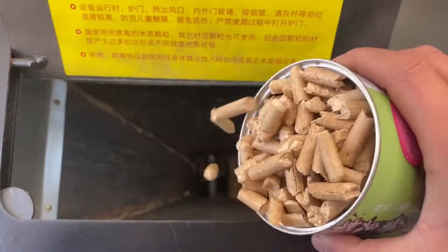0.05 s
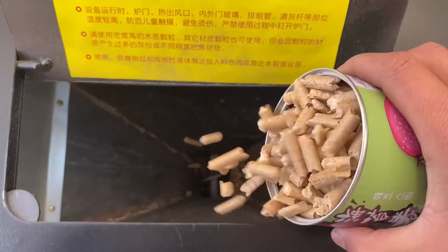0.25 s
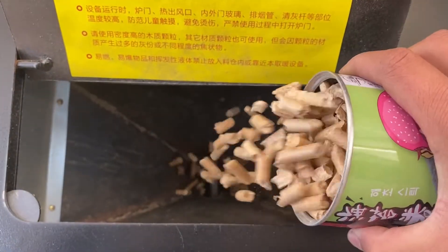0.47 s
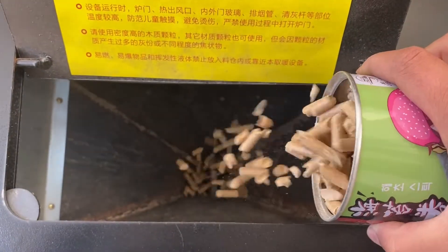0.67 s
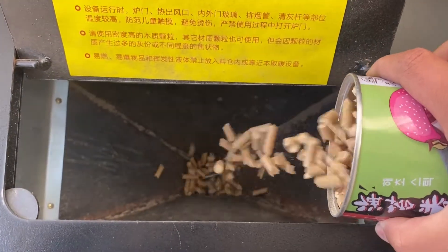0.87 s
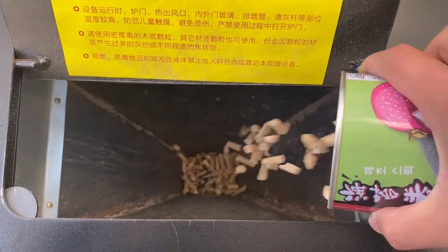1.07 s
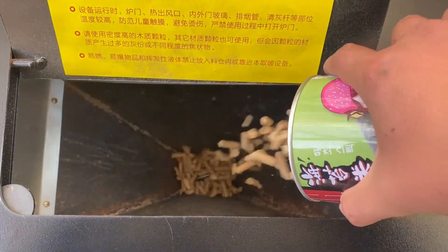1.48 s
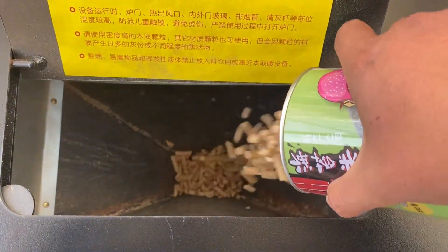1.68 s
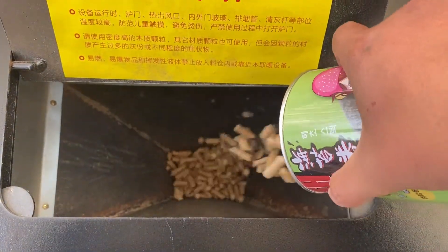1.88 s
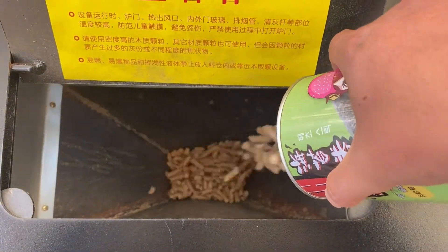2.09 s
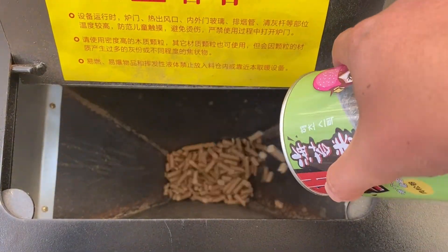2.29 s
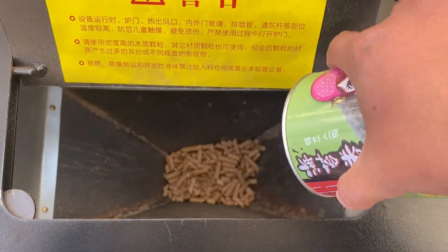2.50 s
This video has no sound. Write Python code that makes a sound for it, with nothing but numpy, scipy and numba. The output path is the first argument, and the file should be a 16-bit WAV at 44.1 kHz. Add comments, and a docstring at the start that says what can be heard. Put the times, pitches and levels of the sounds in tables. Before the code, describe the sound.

Wood pellets pour into a steel hopper up close, clattering and pattering against its ringing walls.

```python
"""A small room: wood pellets are shaken from a can into a steel hopper, close to the microphone.
Pellets tick in the can, which knocks as it tips. Clumps clatter on the walls, single pellets patter
and land on the heap, heavy blows ring the hopper's floor and a side panel.
Mains hum and soft air lie underneath; gain control ducks everything while the pellets fall."""
import sys
import numpy as np
from scipy import signal
from scipy.fft import rfft, irfft
from scipy.io import wavfile
from numba import njit

SR = 44100
rng = np.random.default_rng(int(sys.argv[2]) if len(sys.argv) > 2 else 0)


def generate_wav(sig):
    """Save sig (samples, or channels by samples) to the path in sys.argv[1] as 16-bit PCM at SR."""
    pcm = np.round(np.clip(np.atleast_2d(sig).T, -1, 1) * 32767).astype(np.int16)
    wavfile.write(sys.argv[1], SR, pcm)


N = 116865
t = np.arange(N) / SR
ring_t = t[:int(SR * .6)]

# mains hum partials (frequency [Hz], level [dB])
HUM_PARTIALS = [(100, -39), (200, -53)]
# noise spectra (frequency [Hz], relative level [dB])
AIR_COLOUR = [(30, -29), (70, 3), (130, -5), (300, 0.5), (600, -7), (1000, -18), (2000, -16), (5000, -22.5),
              (15000, -39.5)]
TICK_COLOUR = [(800, -36), (2000, -7), (3800, -2), (9000, -8), (15500, -21)]
BUMP_COLOUR = [(60, -26), (150, -18.5), (300, 4), (600, -1.5), (1200, -5), (2500, -17.5), (8000, -32)]
PATTER_COLOUR = [(100, -28.5), (900, -9.5), (2200, -11), (2800, -6), (5000, -2.5), (7800, -4), (11000, -9),
                 (15500, -14)]
HEAP_COLOUR = [(130, -39), (420, -15.5), (550, 3.5), (820, -7.5), (1100, 2), (1800, 3.5), (2900, -1.5),
               (5000, -1), (9000, -38)]
THUD_COLOUR = [(70, 4), (260, 0.5), (480, -18)]
WALL_COLOUR = [(45, -51), (150, -52.5), (430, -42), (620, 0), (820, -18), (1000, -12), (2100, -11.5),
               (2800, -10), (4000, -6), (6000, -2), (7800, -0.5), (11000, -4.5), (15500, -9.5)]
# decay of hopper and room (band centre [Hz], t60 [s], relative level [dB])
TAIL_BANDS = [(295, 0.17, 2), (1200, 0.51, 2), (3070, 0.27, 3), (6570, .27, -7.5), (13900, .18, -41)]
# wall modes (frequency [Hz], relative level [dB])
WALL_MODES = [(978, -6), (1418, -5), (1740, -7.5), (2000, -7), (2363, -7), (2675, -3), (2770, -3),
              (2864, -6), (3066, -7), (3570, -6), (4387, -6), (5628, -6), (6396, -5), (7765, -4)]
# floor and side panel modes (frequency [Hz], relative level [dB], t60 [s])
FLOOR_MODES = [(558, -1, .17), (619.5, 0, .27), (669, -1, .18), (708, -5, .13)]
PANEL_MODES = [(1418, 0, .23), (1525, -4, .2)]
# pellets shifting in the can (time [s], relative level [dB], ring [Hz])
CAN_TICKS = [(.0045, -23.5, 4300), (0.0679, -22.5, 5200), (0.114, -22, 3830), (.151, -22.5, 4780)]
# heavy blows on floor and side panel (time [s], level [dB], favoured frequency [Hz])
FLOOR_BLOWS = [(.222, -19.5, 560), (.263, -10, 661), (.43, -15, 579), (.52, -9.5, 588), (.593, -10.5, 663),
               (.715, -14, 634), (.895, -6, 593), (.935, -3, 640), (1.374, -9, 599), (1.46, -2.5, 675),
               (1.562, -7, 662), (1.738, -2.5, 598), (1.872, -2, 645), (2.057, -1.5, 670),
               (2.098, -0.5, 661), (2.16, -6, 663), (2.285, -9.5, 668), (2.459, -24, 670)]
PANEL_BLOWS = [(.22, -16, 1420), (.987, -4, 1400), (1.14, -8.5, 1400), (1.245, -12, 1420),
               (1.48, -10, 1440), (1.75, -4, 1400), (1.86, -4.5, 1480), (1.96, -6, 1430)]
# stream strength (time [s], relative patter level [dB], relative heap level [dB])
FLOW = [(0.217, -22.5, -30), (0.268, -26.5, -26.5), (.37, -32.5, -46), (0.451, -21.5, -29),
        (.57, -19.5, -48), (.62, -16.5, -26), (.67, -17, -36), (0.738, -27, -30.5), (0.798, -21.5, -31),
        (1.0, -23, -29.5), (1.1, -20, -33.5), (1.16, -15, -28), (1.26, -30, -35.5), (1.35, -28, -34),
        (1.42, -20, -27), (1.53, -20.5, -27), (1.75, -15.5, -23.5), (1.929, -17, -24.5), (2.0, -18, -22),
        (2.119, -21.5, -23.5), (2.26, -37.5, -34), (2.33, -20.5, -26.5), (2.408, -47, -38)]
# pellets that ring out alone (time [s], frequency [Hz], level [dB])
PINGS = [(.268, 7450, -5), (.406, 7280, -4.5), (.587, 9750, -6), (.622, 2690, -5), (.872, 7270, -10),
         (1.057, 7700, -15), (1.282, 7900, -2), (1.314, 7760, -4), (1.922, 2770, 0), (2.11, 2770, -3.5)]
# clumps on the walls (time [s], relative level [dB], mids against treble [dB])
CLUMPS = [(.1995, -15.5, -20), (.218, -4.5, -1.5), (.266, -4.5, 5.5), (.2975, 2.5, -14), (.379, -19, -9),
          (.406, -10, -5), (.478, -3.5, -6), (.488, 2, -3.5), (.506, -4.5, 1), (.529, -7.5, -28),
          (.593, -5.5, 8), (.617, -1, 1), (.684, 3.5, -5), (.704, -4, 6), (.724, 0.5, 4), (.739, -4.5, 12),
          (.9, -12, 13), (.93, -5, 1), (.963, -1, -1.5), (1.004, -5.5, 6.5), (1.052, -2, -13),
          (1.12, -11.5, 6.5), (1.185, -7, 3), (1.282, -1, 1.5), (1.313, -3.5, 0), (1.373, -5, 6.5),
          (1.384, -2.5, -23), (1.466, -2, 3.5), (1.49, -2.5, -0.5), (1.554, 3, -7.5), (1.573, -1.5, 2),
          (1.622, -7, 6), (1.676, -4.5, 5), (1.694, -1.5, -4), (1.774, -4.5, 4), (1.854, -0.5, -3),
          (1.902, 3.5, 1.5), (1.924, -5.5, 11), (1.961, 3, -23), (2.042, 5, -2), (2.099, -3, 5.5),
          (2.139, -1.5, -17), (2.166, -11, -1), (2.196, -8.5, 5), (2.276, -17.5, 13.5), (2.316, -12, -2),
          (2.339, -11.5, -15), (2.362, -9.5, -1.5), (2.459, -28, 16.5)]


def undb(db):
    """Decibels to gain."""
    return 10 ** (np.asarray(db) / 20)


def unit(x):
    """Scale to unit energy."""
    return x / np.sqrt(np.sum(x ** 2))


def fade(t60_s):
    """Exponential ring-down."""
    return np.exp(-np.log(1000) * ring_t / t60_s)


def tone(hz, t60_s, wave=np.sin):
    """One damped mode."""
    return fade(t60_s) * wave(2 * np.pi * hz * ring_t)


def add(out, at_s, x):
    """Mix x into out at a time."""
    i = max(int(at_s * SR), 0)
    out[i:i + len(x)] += x[:len(out) - i]


def excite(x, response):
    """Convolve x with an impulse response."""
    return signal.fftconvolve(x, response)[:N]


def noise(colour, size=len(ring_t)):
    """Noise of rms 1 with the given spectrum."""
    hz, db = np.array(colour).T
    bins_hz = np.fft.rfftfreq(size, 1 / SR)
    magnitude = undb(np.interp(np.log(bins_hz + 1), np.log(hz), db))
    x = irfft(np.exp(2j * np.pi * rng.random(len(bins_hz))) * magnitude, size)
    return x / x.std()


def room(air_db=-41):
    """Mains hum over a soft rush of air."""
    hum = sum(undb(db) * np.sin(2 * np.pi * (hz * t + rng.random())) for hz, db in HUM_PARTIALS)
    return np.sqrt(2) * hum + undb(air_db) * noise(AIR_COLOUR, N)


def can(tip_s=.146, bump_db=-26.5):
    """Dry ticks of pellets shifting in the can; a dull knock as it tips."""
    out = np.zeros(N)
    for at_s, db, hz in CAN_TICKS:
        tick = noise(TICK_COLOUR) * fade(t60_s=.025) + undb(8.5) * tone(hz, t60_s=.009)
        add(out, at_s, undb(db - 6) * tick)
    add(out, tip_s, undb(bump_db) * noise(BUMP_COLOUR) * fade(t60_s=.36))
    return out


def sheet(blows, modes, rise_s=.0082, detune_db_per_hz=.4, crunch_db=-10, band_ratio=1.12):
    """A struck steel sheet rings, roughened by crunching pellets; each spot favours nearby modes."""
    out = np.zeros(N)
    for at_s, blow_db, spot_hz in blows:
        ring = sum(undb(db - detune_db_per_hz * abs(hz - spot_hz)) * tone(hz, t60_s, np.cos)
                   for hz, db, t60_s in modes)
        band = signal.butter(2, [spot_hz / band_ratio, spot_hz * band_ratio], "band", fs=SR)
        crunch = signal.lfilter(*band, rng.standard_normal(len(ring_t))) * fade(t60_s=.12)
        blow = unit(ring) + undb(crunch_db) * unit(crunch)
        blow *= 1 - np.exp(-ring_t / rise_s)
        add(out, at_s, undb(blow_db) * blow / np.abs(blow).max())
    return out


def struck_modes(modes):
    """Modes rung from one spot, each with random polarity."""
    return unit(sum(undb(db) * rng.choice([-1, 1]) * unit(tone(hz, t60_s, np.cos))
                    for hz, db, t60_s in modes))


def hopper_tail(colour):
    """Hopper and room ring on, each band at its own decay rate."""
    spectrum = rfft(noise(colour))
    log_bins = np.log(np.fft.rfftfreq(len(ring_t), 1 / SR) + 1)
    log_centres = np.log(np.array(TAIL_BANDS)[:, 0])
    tail = np.zeros(len(ring_t))
    for share, (_, t60_s, db) in zip(np.eye(len(TAIL_BANDS)), TAIL_BANDS):
        band = irfft(spectrum * np.interp(log_bins, log_centres, share), len(ring_t))
        tail += undb(db) * band * unit(fade(t60_s))
    return tail


def hopper_spot(colour, modes_db=-6.5, crack_db=-23, scatter_db=2, lowest_t60_s=.26):
    """Response of one spot: crack, quick reflections, tail and wall modes; higher modes die sooner."""
    reflections = unit(noise(colour) * fade(t60_s=.086))
    crack = undb(crack_db) * unit(noise(colour) * fade(t60_s=.015))
    tail = hopper_tail(colour)
    lowest_hz = WALL_MODES[0][0]
    modes = [(hz, db + scatter_db * rng.standard_normal(), lowest_t60_s * (lowest_hz / hz) ** .2)
             for hz, db in WALL_MODES]
    return unit(crack + reflections + tail + undb(modes_db) * struck_modes(modes))


def throat(x, echo_db=-10):
    """Quick echoes in the hopper's throat give every pellet the same hollow colour."""
    echoes = unit(rng.standard_normal(len(ring_t)) * fade(t60_s=.03))
    return (x + undb(echo_db) * excite(x, echoes)) / np.hypot(1, undb(echo_db))


def clink(length, low_hz=3270, high_hz=13100):
    """Short ring of one pellet; length 0-1, longer is lower."""
    return tone(high_hz * (low_hz / high_hz) ** length, t60_s=.018)


def impacts(per_s, level_db, spots, scatter_db=5.5, edge_s=.012):
    """Random impulse trains, one per spot, following levels given at the FLOW times."""
    times_s = np.array(FLOW)[:, 0]
    gate = np.clip(1 + np.minimum(t - times_s[0], times_s[-1] - t) / edge_s, 0, 1)
    hits = (rng.random(N) < per_s / SR) * undb(scatter_db * np.minimum(rng.standard_normal(N), 2))
    hits *= rng.choice([-1, 1], N)
    hits = hits / hits.std() * gate * undb(np.interp(t, times_s, level_db))
    spot = rng.integers(spots, size=N)
    return [hits * (spot == k) for k in range(spots)]


def stream(patter_per_s=350, landings_per_s=550, clinks_per_s=55, thud_db_per_s=8):
    """Single pellets patter and clink on the walls, thud on the heap and stir the hopper floor."""
    times_s, patter_db, heap_db = np.array(FLOW).T
    out = np.zeros(N)
    for hits in impacts(patter_per_s, patter_db + 9, spots=4):
        out += excite(hits, hopper_spot(PATTER_COLOUR))
    for hits in impacts(landings_per_s, heap_db + 13, spots=4):
        heap = hopper_spot(HEAP_COLOUR, modes_db=-8.5)
        floor = undb(-5) * struck_modes(FLOOR_MODES)
        out += excite(hits, heap + floor)
    span_s = times_s[-1] - times_s[0]
    for position, length, strength in rng.random((int(clinks_per_s * span_s), 3)):
        at_s = times_s[0] + position * span_s
        gain = strength * undb(np.interp(at_s, times_s, patter_db) + 13.5)
        add(out, at_s, gain * clink(length))
    thud_db = -37.5 + thud_db_per_s * times_s + .44 * heap_db  # the growing heap thuds more
    for hits in impacts(landings_per_s, thud_db, spots=2):
        out += excite(hits, hopper_spot(THUD_COLOUR, modes_db=-np.inf))
    return out


def pings():
    """A few pellets ring out clearly by themselves."""
    out = np.zeros(N)
    for at_s, hz, db in PINGS:
        add(out, at_s, undb(db) * tone(hz, t60_s=.075))
    return out


def clumps(pellets=5, spread_s=.018, gain_db=24.5, follower_db=-7, clink_db=-11.5, shelf_hz=3480):
    """Clumps hit the walls: one hard pellet, softer ones close behind, each with its own clink."""
    out = np.zeros(N)
    spots = [hopper_spot(WALL_COLOUR) for _ in range(pellets)]
    lowpass = signal.butter(1, shelf_hz, fs=SR)
    for k, (at_s, db, mids_db) in enumerate(CLUMPS):
        for j, (lag, length) in enumerate(rng.random((pellets, 2))):
            hit = spots[(k + j) % pellets] + undb(clink_db) * unit(clink(length))
            hit += (undb(mids_db) - 1) * signal.lfilter(*lowpass, hit)
            follows = j > 0
            add(out, at_s + lag * spread_s * follows, hit * undb(gain_db + db + follower_db * follows))
    return out


def scene():
    """Room, can, ringing sheets and falling pellets, in mono."""
    background = room() + can()
    steel = sheet(FLOOR_BLOWS, FLOOR_MODES) + sheet(PANEL_BLOWS, PANEL_MODES)
    pellets = throat(clumps() + pings() + stream())
    return (background + steel + pellets)[None]


@njit
def envelope(x, attack_s, release_s):
    """One-pole level follower with separate rise and fall times."""
    out, level = np.empty(len(x)), 0.
    for i in range(len(x)):
        level += (x[i] - level) / (SR * (attack_s if x[i] > level else release_s))
        out[i] = level
    return out


def record(dry):
    """The microphone drops deep bass, gain control ducks the pour, peaks are rounded, the top is cut."""
    low_cut_hz, top_hz = 69, 15700
    threshold_db, ratio = -19.5, 2.67
    mic = signal.sosfilt(signal.butter(6, low_cut_hz, "high", fs=SR, output="sos"), dry)
    level = envelope(np.abs(mic[0]), attack_s=.025, release_s=.84)
    gain = np.maximum(level / undb(threshold_db), 1) ** (1 / ratio - 1)
    top_cut = signal.ellip(10, .2, 80, top_hz, fs=SR, output="sos")
    return signal.sosfilt(top_cut, np.tanh(mic * gain))


dry = scene()
out = record(dry)
generate_wav(out)
```